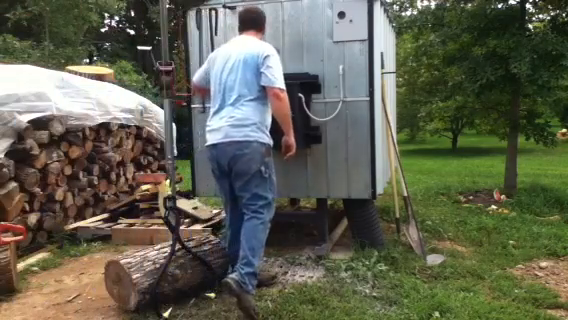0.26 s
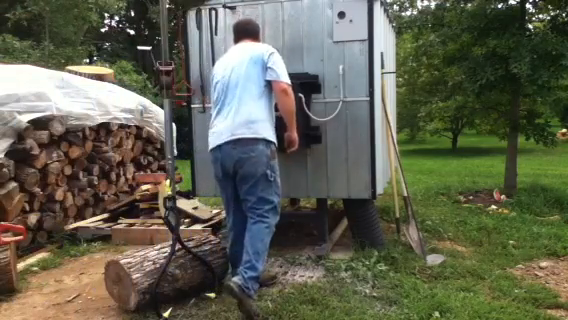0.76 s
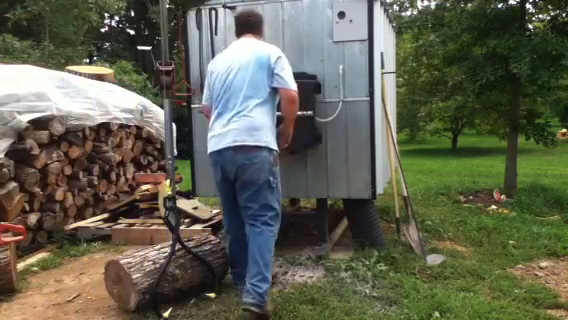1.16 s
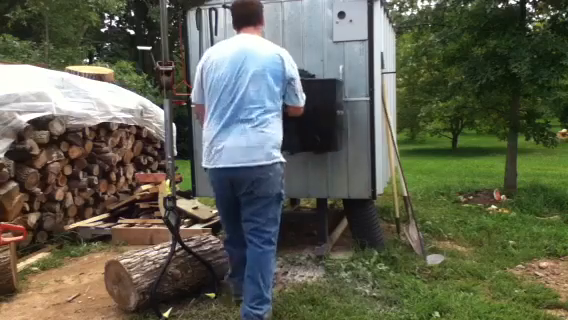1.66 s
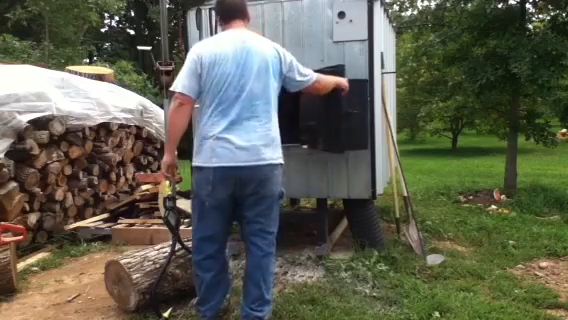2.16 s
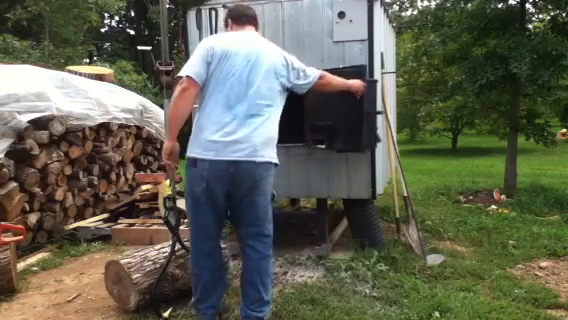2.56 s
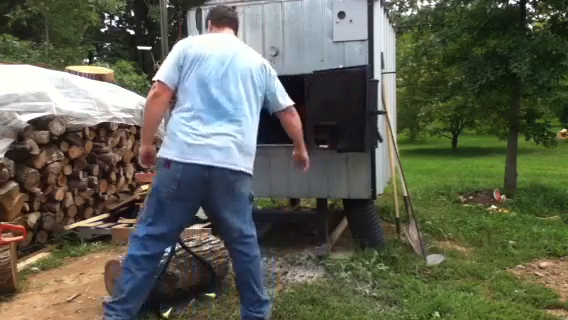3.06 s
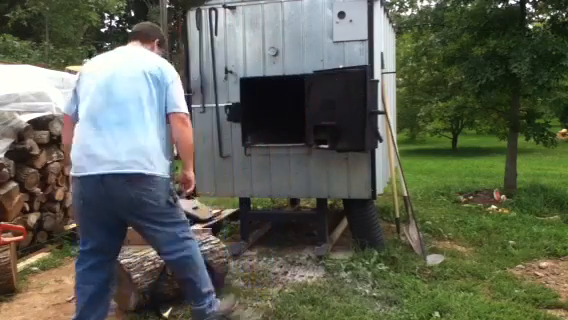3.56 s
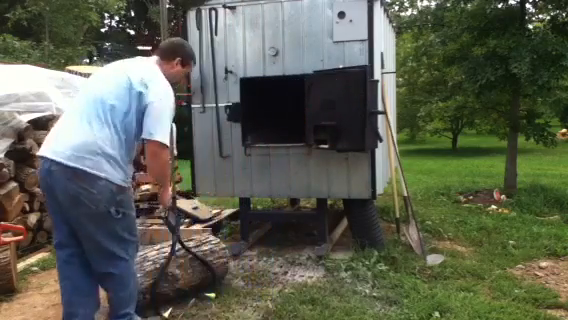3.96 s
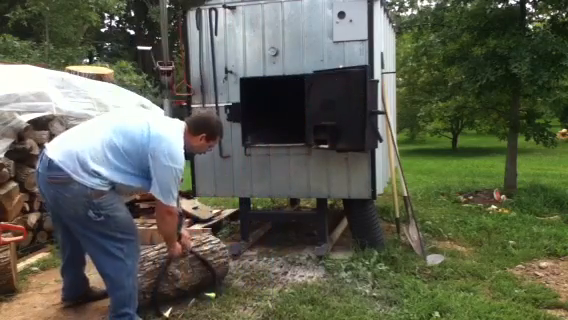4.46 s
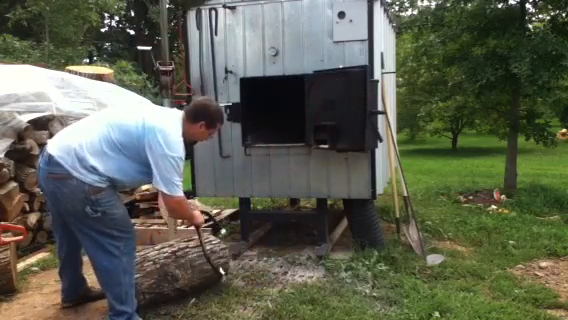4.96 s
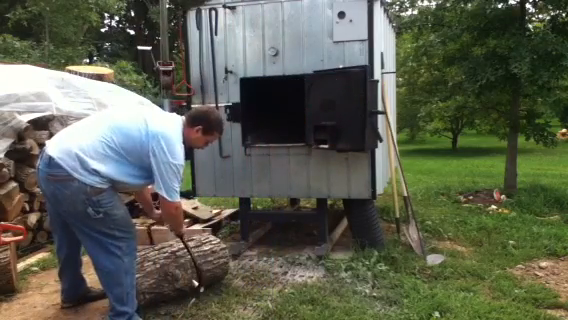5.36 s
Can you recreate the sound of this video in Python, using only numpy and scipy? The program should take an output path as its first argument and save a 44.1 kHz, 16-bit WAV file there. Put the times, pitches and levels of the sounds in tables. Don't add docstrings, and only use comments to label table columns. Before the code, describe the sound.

Outdoors over a faint low breeze, a steel furnace latch rattles and bangs open in a fast burst, ringing the plate and booming the hollow firebox. A dry hinge gives one short high squeal, the door softly bumps its stop, feet and cloth scuff, and finally iron log tongs clink in small bright taps. A small camera microphone hears it from a few metres.

```python
import sys
import numpy as np
from scipy import signal
from scipy.fft import rfft, irfft
from scipy.io import wavfile

SR = 44100
rng = np.random.default_rng(int(sys.argv[2]) if len(sys.argv) > 2 else 0)


def gain_from_db(level_db):
    decades = np.asarray(level_db, float) / 20
    return 10 ** decades


def to_wav(s):
    ch = np.atleast_2d(s).T
    pcm = np.round(np.clip(ch, -1, 1) * 32767)
    wavfile.write(sys.argv[1], SR, pcm.astype(np.int16))


N = 246959

# pitch_hz, level_db (per Hz)
AIR_COLOUR = [(12, -40), (20, -19.5), (32, -19), (48, -7), (70, -2.5), (145, -1), (250, -5), (385, -10),
              (600, -12.5), (1140, -17.5), (1600, -21.5), (5000, -24), (11000, -25.5), (15500, -30.5)]
# time_s, level_db
BREEZE = [(0.0, -65), (0.3, -66), (1.32, -65.5), (1.95, -65), (2.21, -66), (2.85, -65), (3.51, -66),
          (4.87, -66), (5.6, -66.5)]
# pitch_hz, level_db, ring_s
DOOR_MODES = [(238.6, -12, 0.57), (307, -28, .2), (386, -19, 0.13), (425, -20.5, 0.28), (496, -7, 0.37),
              (554.6, 0, 0.37), (635, -7.5, 0.21), (727, -3, 0.12), (778, -16, 0.5), (980, -4, 0.19),
              (972, -14, .3), (1050, -10, 0.33), (1000, -12, 0.15), (1216, -9, 0.16), (1255, -4, 0.26),
              (1428, -15.5, 0.44), (1414, 0.5, 0.068), (1520, -24, 0.28), (1595, -5, 0.16),
              (1757, 0.5, 0.13), (1926, -4.5, 0.15), (2480, -38, 0.22), (2940, -22, 0.062)]
# pitch_hz, level_db, ring_s
DENSE_PLATE = [(180, -18, 1), (302, -16, 0.58), (600, -4.5, 0.2), (1030, -3, 0.1), (1700, -12.5, 0.17),
               (3000, -17, 0.099), (6000, -35, 0.13), (9700, -40, 0.19), (13000, -80, .04)]
# start_s, peak_db, rattle_s, brightness_db_per_octave
LATCH_BLOWS = [(0.0, -43, 0.0069, -6), (0.0783, -32, 0.0024, -2), (0.135, -33, 0.016, -0.5),
               (0.157, -32.5, 0.015, -4), (.205, -29, 0.0022, 6.5), (0.208, -22, 0.0086, 3.5),
               (.2195, -21.5, 0.011, -2), (0.237, -28, 0.0037, 4.5), (0.267, -25.5, 0.0057, 0),
               (.294, -46, .01, 10.5), (0.357, -27.5, 0.0051, -4.5), (0.357, -21.5, 0.02, -1),
               (0.3969, -18, 0.012, -.5), (0.4039, -16.5, 0.014, 3), (0.417, -18, 0.0043, 0.5),
               (0.4245, -14.5, 0.004, 0.5), (0.4325, -15.5, 0.0037, 2), (0.444, -31, 0.01, 5.5),
               (.467, -27.5, 0.0067, -3), (0.622, -31, 0.024, -2), (.654, -35.5, 0.017, -3.5),
               (0.677, -24.5, 0.0048, -3), (0.689, -32, 0.015, -1.5), (0.715, -41, 0.005, -0.5)]
# start_s, peak_db, rattle_s, brightness_db_per_octave
DOOR_BUMPS = [
    (1.578, -43.5, 0.0011, -5.5),
    (1.843, -29, 0.0058, -7.5),
    (1.846, -37.5, 0.021, -2.5),
    (1.863, -40, 0.02, 0),
    (2.736, -29.5, .00058, -3),
    (2.739, -39.5, 0.0093, 2.5),
    (2.761, -42, 0.013, 1.5),
    (2.792, -46.5, 0.011, 1.5),
]
# start_s, ring_factor (no unit)
HAND = [(0.0, 1.3), (.2, 1.14), (.355, 0.78), (.415, 0.51), (.44, 1.36), (.6, 0.71), (1.2, 0.17), (2.4, .7)]
# start_s, pitch_hz, peak_db
BOOMS = [(.01, 116, -40), (.071, 119, -40.5), (0.13, 125, -43), (.215, 124.6, -20), (.22, 70, -30.5),
         (0.263, 105, -32.5), (0.311, 139, -33.5), (0.356, 124, -31), (0.4, 119, -27), (.439, 80.6, -32),
         (0.562, 129, -28), (0.626, 125, -24.5), (0.692, 112, -27), (0.736, 113, -29), (.80, 115.6, -40),
         (.86, 120.7, -41), (.89, 64.5, -44), (1.0, 119, -44), (.53, 105, -41), (.56, 60, -42),
         (1.179, 137, -39.5), (1.561, 109.3, -41.5), (2.736, 130, -28.5), (2.792, 102.7, -30.5),
         (2.804, 152, -36.5), (2.92, 137, -42.5)]
# start_s, pitch_hz, peak_db, ring_s
PLATE_NOTES = [(.16, 576, -44.5, 0.48), (.211, 423, -44.5, 0.35), (.212, 540, -35, 0.21),
               (.234, 972, -28, 0.2), (.435, 194, -31, 0.21), (.44, 425, -44, 0.36), (.45, 587, -46, 0.2),
               (.625, 1926, -37.5, 0.057), (0.631, 1844, -36, 0.068), (.70, 427.5, -48, 0.76),
               (.68, 958, -38, 0.091), (.68, 1240, -38, 0.11), (.685, 1579, -49, 0.17),
               (.625, 541, -42, 0.22), (.625, 845, -45, 0.24), (.71, 648, -39.5, .15), (.40, 194, -38, .2),
               (.69, 195.7, -44.5, 0.29), (.08, 999, -44, 0.17), (.445, 1093, -27, 0.045),
               (.70, 540, -41, 0.34), (2.738, 727, -38, 0.12)]
# peak_s, peak_db, pitch_hz
KNOCKS = [(.0795, -27.5, 1000), (.2146, -26, 900), (.2231, -18.5, 1186), (.2272, -19, 870),
          (.2299, -22, 1320), (.2335, -18, 1110), (.2420, -22, 1100), (.2449, -29, 950),
          (.2658, -21.5, 1090), (.3585, -26, 700), (.361, -26, 900), (.397, -21, 1000), (.3995, -17, 1130),
          (.403, -21, 1170), (.4062, -14, 1270), (.4098, -14, 920), (.4178, -14, 880), (.4204, -13, 1140),
          (.4254, -12, 800), (.4288, -19, 1365), (.4335, -8.5, 1185), (.4371, -18, 1020),
          (.4446, -16, 1090), (.6803, -28, 694), (.6829, -26, 680), (.6931, -26, 830), (.7004, -26, 880),
          (1.58, -38, 517)]
# start_s, peak_db, centre_hz, length_s
GRATES = [(0.214, -35, 2800, .006), (0.224, -36, 2000, .012), (.398, -29, 2240, .008),
          (0.406, -30, 2800, .012), (0.423, -34, 2600, .014), (0.451, -27, 1400, .006),
          (.625, -43, 1100, .02), (2.742, -48, 1700, .008), (2.786, -50, 1500, .016),
          (.955, -53, 890, .012), (1.85, -46.5, 1200, .02), (4.673, -38, 3000, .008)]
# start_s, peak_db, centre_hz, length_s
SCUFFS = [(1.201, -46, 205, 0.019), (1.34, -43.5, 152, 0.025), (2.633, -49, 1600, 0.011),
          (2.684, -44, 6000, 0.012), (2.702, -42.5, 5600, 0.022), (2.869, -50, 7400, 0.0079),
          (3.251, -42, 250, 0.015), (3.273, -49, 910, 0.012), (3.403, -45, 600, 0.016),
          (3.473, -51, 1170, 0.012), (3.523, -51.5, 600, 0.019), (4.027, -48, 1480, .025),
          (4.361, -45, 165, 0.013), (4.464, -51.5, 1400, 0.004), (1.542, -50, 1200, 0.019),
          (2.71, -43, 1803, 0.0044), (4.604, -48, 11000, 0.0094), (2.718, -47.5, 11000, 0.019)]
# start_s, peak_db, centre_hz, length_s
TICKS = [(2.6855, -44, 6000, .003), (4.7652, -33, 8000, .0015), (4.7868, -41, 6500, .002)]
# time_s, pitch_hz, level_db
LOCKED_SQUEAL = [(1.69, 2222, -56), (1.712, 2231, -27.5), (1.724, 2234, -24), (1.757, 2244, -21.8),
                 (1.78, 2246, -23.6), (1.80, 2247, -23), (1.835, 2248, -26.5), (1.908, 2247, -24)]
# time_s, pitch_hz, level_db
FREE_SLIDE = [(1.898, 2247, -55), (1.928, 2279, -45), (1.946, 2286, -40), (1.958, 2295, -34.5),
              (1.988, 2299, -35), (2.0, 2325, -46), (2.012, 2335, -70)]
# pitch_hz, gain_db, ring_s
HINGE_MODES = [(2245, -18, 0.8), (2330, -13.5, 0.32), (2280, -4, .3)]
# start_s, peak_db, rattle_s, centre_hz
CLINKS = [(4.544, -35.5, 0.0011, 2280), (4.555, -38, .001, 2510), (4.569, -36, 0.00093, 1700),
          (4.577, -37, .001, 2000), (4.592, -37, 0.00097, 1800), (4.601, -27.5, 0.0025, 3000),
          (4.628, -38, 0.0031, 2700), (4.647, -47, 0.0036, 1500), (4.666, -43, 0.0032, 2000),
          (4.6723, -27, 0.0056, 3300), (4.68, -27.5, 0.009, 2400), (4.687, -38, 0.002, 1510),
          (4.726, -39, 0.0055, 2400), (4.75, -41, 0.0051, 2480), (4.768, -34, 0.0012, 3470),
          (4.7858, -32, 0.0013, 3000), (4.791, -42, 0.0029, 1500), (4.833, -48, 0.0039, 2200),
          (4.918, -37.5, 0.011, 2020), (5.062, -54, 0.0036, 1500), (5.121, -53, 0.0062, 2200),
          (5.178, -48, 0.0043, 1400), (5.269, -50, 0.027, 2600)]
# pitch_hz, level_db, ring_s
TONG_MODES = [(1400, -14, 0.065), (1682, -18.5, 0.087), (1830, -24, 0.045), (2366, -4.5, 0.052),
              (2514, -8.5, 0.051), (2760, -17.5, 0.11), (2820, -21, 0.08), (3370, -22, 0.05),
              (3437, -5, 0.032), (3680, -10.5, 0.096), (4140, -30, .05), (4520, -16, .06),
              (5000, -31, 0.044), (5550, -7, 0.05), (6000, -18, 0.1), (6500, -33, .1), (7770, -16, 0.13),
              (8000, -12, 0.11), (9400, -23, .1), (12180, -36, 0.11)]
# pitch_hz, level_db, ring_s
JOINT = [(720, -13.5, 0.072), (1330, -12, 0.07), (2400, -9, 0.075), (3600, -12, 0.039), (6000, -13.5, .04),
         (9000, -20, 0.079), (15000, -38, .02)]
# start_s, pitch_hz, peak_db
PINGS = [(4.545, 3330, -39), (4.545, 1820, -39), (4.558, 6000, -53), (4.560, 5420, -47), (4.562, 5670, -51),
         (4.565, 5117, -54), (4.572, 3330, -38), (4.602, 5500, -37), (4.602, 3330, -35.5),
         (4.605, 5900, -46), (4.603, 14700, -57), (4.672, 3427, -26.5), (4.672, 2342, -28.5),
         (4.673, 5421, -45), (4.673, 5496, -44), (4.672, 5920, -45.5), (4.68, 5120, -54),
         (4.675, 7122, -50.5), (4.724, 1720, -44), (4.771, 5880, -55), (4.762, 1790, -46),
         (4.786, 4100, -30.5), (4.786, 3490, -34), (4.795, 2220, -45), (4.919, 5600, -57.5),
         (4.925, 7160, -60), (5.126, 1424, -48), (4.919, 3700, -55), (5.232, 2890, -61.5),
         (5.278, 3400, -53), (5.268, 2890, -61), (5.13, 2400, -59), (5.125, 3400, -56), (4.628, 5950, -51),
         (4.925, 7900, -66)]
# pitch_hz, ring_s
PING_RING = [(1500, 0.062), (2350, 0.072), (2880, 0.2), (3350, 0.07), (4200, 0.017), (5100, 0.6),
             (7200, 0.27)]
GRIPS = [4.632, 4.768, 4.815, 4.939, 5.305]
# peak_s, peak_db, pitch_hz
TAPS = [(4.5454, -33, 2900), (4.5542, -34, 3600), (4.5545, -41, 1900), (4.5694, -35, 1770),
        (4.5754, -33, 1710), (4.5942, -33, 2180), (4.6033, -30, 2240), (4.6085, -35, 3150),
        (4.63, -38, 3190), (4.6725, -25, 2400), (4.6743, -26.5, 3310), (4.6839, -31, 3510),
        (4.6949, -31.5, 1630), (4.7018, -44, 2360), (4.7252, -35, 1670), (4.7677, -37, 1790),
        (4.7871, -32, 3750), (4.7959, -36, 3490), (4.8, -39, 2160)]
# delay_s, level_db
ECHOES = [(.021, -16.5), (.047, -20), (.083, -23), (.13, -29), (.19, -33)]

CHOKE_S = 0.0039


def at_hz(points, hz):
    points = np.array(points)
    return np.interp(np.log(hz), np.log(points[:, 0]), points[:, 1])


def add(out, start_s, x):
    i = max(round(start_s * SR), 0)
    out[i:i + len(x)] += x[:N - i]


def uneven(per_s, t):
    knots = rng.standard_normal(400)
    return np.interp((t - t[0]) * per_s, np.arange(400), knots)


def band_pass(x, low_hz, high_hz):
    return signal.sosfilt(signal.butter(2, [low_hz, high_hz], "band", fs=SR, output="sos"), x)


def air():
    settle = 8000
    edges = 18 * 2 ** np.arange(0, 10.1, .5)
    white = rng.standard_normal((2, N + settle))
    t = np.arange(N) / SR
    breeze_s, hiss_db = np.transpose(BREEZE)
    gust_db = np.interp(t, breeze_s, hiss_db - np.mean(hiss_db))
    out = np.zeros(N)
    for k, (low, high) in enumerate(zip(edges, edges[1:])):
        band = band_pass(white[k % 2], low, high)[settle:]
        hz = np.sqrt(low * high)
        flicker_db = (hz / 200) ** -.15 * uneven(5.6, t)
        out += band * gain_from_db(at_hz(AIR_COLOUR, hz) + gust_db + flicker_db)
    return gain_from_db(-54.5) * out / np.std(out)


def tilted(modes, db_per_octave):
    modes = np.array(modes)
    return modes + np.log2(modes[:, :1] / 1000) * [0, db_per_octave, 0]


def ringing(modes, spread_db, size):
    hz, db, ring_s = np.transpose(modes)[:, :, None]
    t = np.arange(size) / SR
    luck = rng.standard_normal((len(hz), 1))
    strength = gain_from_db(db + spread_db * luck) * np.sign(luck)
    return np.sum(strength * gain_from_db(-60 * t / ring_s) * np.sin(2 * np.pi * hz * t), axis=0)


def dense_modes(body, level_db, ring_factor, size):
    t = np.arange(size) / SR
    hz = np.fft.rfftfreq(size, 1 / SR) + 1
    centres = 150 * 2 ** np.arange(0, 7, .5)[:, None]
    share = np.clip(1 - 2 * np.abs(np.log2(hz / centres)), 0, 1)
    bands = irfft(rfft(rng.standard_normal(size)) * share, size)
    body = np.array(body)
    db = at_hz(body[:, :2], centres)
    ring_s = ring_factor * at_hz(body[:, ::2], centres)
    return np.sum(gain_from_db(level_db + db - 60 * t / ring_s) * bands, axis=0)


def rattle(length_s, centre_hz, rough_db, first):
    size = 2400
    t = np.arange(size) / SR
    hits = gain_from_db(rough_db * rng.standard_normal(size)) * rng.choice([-1, 1], size)
    hits *= rng.random(size) < .06
    fade = np.exp(-(t / max(length_s, 1e-4)) ** 1.46) * (t < .045)
    chatter = hits * fade
    chatter[0] = first
    colour = signal.butter(1, [centre_hz / 2.16, centre_hz * 1.485], "band", fs=SR)
    return signal.lfilter(*colour, chatter)


def struck(contact, response, peak_db):
    x = signal.fftconvolve(contact, response)
    return gain_from_db(peak_db) * x / np.abs(x).max()


def door_blows():
    out = np.zeros(N)
    size = 16000
    for s, db, length_s, tilt in LATCH_BLOWS + DOOR_BUMPS:
        ring_factor = [factor for start, factor in HAND if start <= s + .002][-1]
        clear = ringing(tilted(DOOR_MODES, tilt) * [1, 1, ring_factor], 5.2, size)
        dense = dense_modes(tilted(DENSE_PLATE, tilt), 31.4, ring_factor, size)
        contact_hz = 1020 * 2 ** (tilt / 5.5)
        contact = rattle(length_s, contact_hz, 7.86, first=8.1)
        add(out, s, struck(contact, clear + dense, db))
    return out


def swell(hz, peak_db, rise_s, ring_s):
    t = np.arange(30000) / SR
    envelope = gain_from_db(peak_db - 60 * t / ring_s) * (1 - np.exp(-t / rise_s))
    return 1.58 * envelope * np.sin(2 * np.pi * hz * t)


def firebox_booms():
    out = np.zeros(N)
    for s, hz, db in BOOMS:
        add(out, s, swell(hz, db, rise_s=0.016, ring_s=0.14))
    return out


def plate_notes():
    out = np.zeros(N)
    for s, hz, db, ring_s in PLATE_NOTES:
        add(out, s, swell(hz, db, .008, ring_s))
    return out


def contacts(rows, swings):
    out = np.zeros(N)
    lead = 100
    for s, db, hz in rows:
        phase = (np.arange(600) - lead) / SR * hz
        shape = np.exp(-(phase / np.where(phase < 0, 0.62 * swings, swings)) ** 2)
        add(out, s - lead / SR, gain_from_db(db) * shape * np.cos(2 * np.pi * phase))
    return out


def scuffs():
    out = np.zeros(N)
    size = 4000
    t = np.arange(size) / SR
    for s, db, hz, length_s in SCUFFS + TICKS + GRATES:
        grit = rng.standard_normal(size) * gain_from_db(3.1 * rng.standard_normal(size))
        u = t / length_s
        shape = u * np.exp(1 - u) * np.exp(-(u / 2.05) ** 4)
        x = band_pass(grit * shape, hz / 2.15, min(hz * 1.26, 16000))
        add(out, s - length_s / 4, gain_from_db(db) * x / np.abs(x).max())
    return out


def hinge():
    t = np.arange(round(1.68 * SR), round(2.5 * SR)) / SR
    unlock_s, unlock_rise_s = 1.898, .035
    let_go_s, lock_ring_s = 1.914, .18
    slip_s, slip_hz, slip_db = np.transpose(LOCKED_SQUEAL[:-1] + FREE_SLIDE)
    held_s, held_hz, held_db = np.transpose(LOCKED_SQUEAL)
    free = np.clip((t - unlock_s) / unlock_rise_s, 0, 1)
    slip = 2 * np.pi * np.cumsum(np.interp(t, slip_s, slip_hz)) / SR
    plate = 2 * np.pi * np.cumsum(np.interp(t, held_s, held_hz)) / SR
    plate_db = np.interp(t, held_s, held_db) - 60 * np.maximum(t - let_go_s, 0) / lock_ring_s
    free_db = np.interp(t, slip_s, slip_db, right=-150)
    tone = gain_from_db(plate_db) * np.sin(plate) + free * gain_from_db(free_db) * np.sin(slip)

    rub = np.clip(np.minimum(t - 1.70, 1.972 - t) / 0.007, 0, 1)
    flutter_db = 7.5 * np.sqrt(free) * np.cos(2 * np.pi * 33.4 * (t - 1.957))
    bite_db = 12 * np.exp(-((t - 1.726) / 0.014) ** 2)
    # number, level_db, change_db once unlocked, extra_db
    overtones = [(2, -50.5, 2.5, flutter_db), (3, -62, -2, bite_db), (4, -70, -9.5, 0)]
    for number, db, change_db, extra_db in overtones:
        level_db = db + np.sqrt(free) * change_db + extra_db + 3 * uneven(40, t)
        tone += rub * gain_from_db(level_db) * np.sin(number * slip)
    tone *= np.sqrt(2) * np.minimum((t - t[0]) / .012, 1)

    sound = tone.copy()
    for mode_hz, db, ring_s in HINGE_MODES:
        r = gain_from_db(-60 / (ring_s * SR))
        w = 2 * np.pi * mode_hz / SR
        sound += gain_from_db(db) * signal.lfilter([1 - r, 0, r - 1], [1, -2 * r * np.cos(w), r * r], tone)
    out = np.zeros(N)
    add(out, t[0], sound)
    return out


def choke(t, free_s):
    return np.exp(-np.maximum(t - free_s, 0) / CHOKE_S)


def tong_clinks():
    out = np.zeros(N)
    size = 8000
    t = np.arange(size) / SR
    for s, db, length_s, hz in CLINKS:
        response = ringing(TONG_MODES, 2.7, size) + dense_modes(JOINT, 14.0, 1, size)
        contact = rattle(length_s, hz, 1.6, first=1.64)
        add(out, s, struck(contact, choke(t, 0.022) * response, db))
    return out


def arm_pings():
    out = np.zeros(N)
    t = np.arange(8000) / SR
    for s, hz, db in PINGS:
        free_s = min(grip - s for grip in GRIPS if grip > s)
        chatter_db = 4.0 * (0.68 if hz > 5000 else 1)
        level_db = db - 60 * t / at_hz(PING_RING, hz) + chatter_db * uneven(224, t)
        envelope = gain_from_db(level_db) * np.minimum(t / 0.0016, 1) * choke(t, free_s)
        add(out, s, envelope * np.sin(2 * np.pi * hz * t))
    return out


def scene():
    plate = door_blows() + firebox_booms() + plate_notes() + contacts(KNOCKS, swings=0.94)
    small = scuffs() + tong_clinks() + arm_pings() + contacts(TAPS, swings=1.3)
    squeal = hinge()
    out = plate + squeal + small + air()
    dull = signal.lfilter([.3], [1, -.7], plate + small + 0.71 * squeal)
    for delay_s, db in ECHOES:
        add(out, delay_s, gain_from_db(db) * dull)
    return out[None]


def band_limit(x):
    return signal.sosfilt(signal.butter(12, 15920, fs=SR, output="sos"), x)


def record(dry):
    mix = signal.sosfilt(signal.ellip(10, .5, 60, 15780, fs=SR, output="sos"), dry)
    return band_limit(mix)


dry = scene()
out = record(dry)
to_wav(out)
```